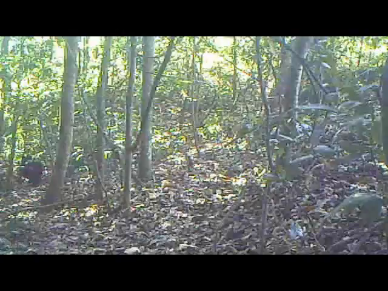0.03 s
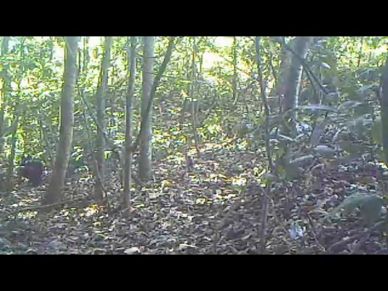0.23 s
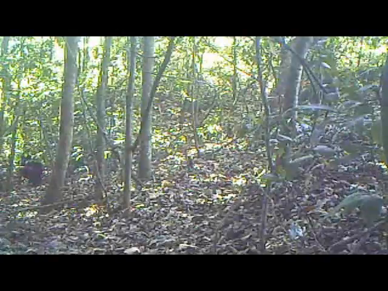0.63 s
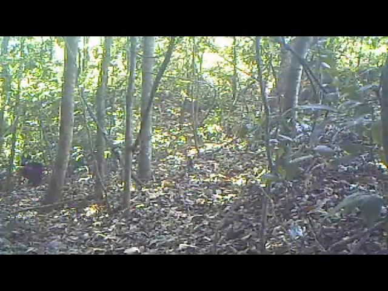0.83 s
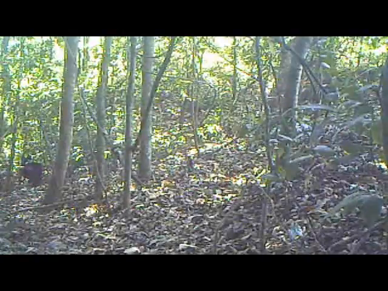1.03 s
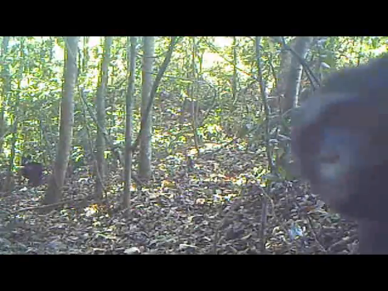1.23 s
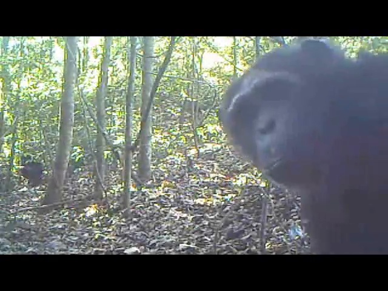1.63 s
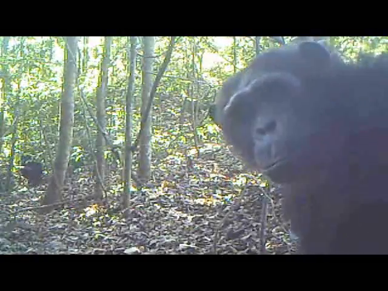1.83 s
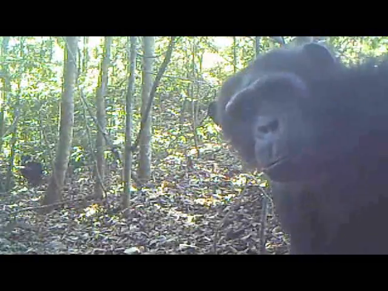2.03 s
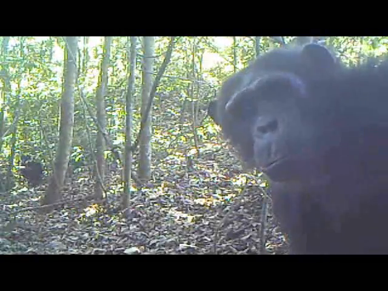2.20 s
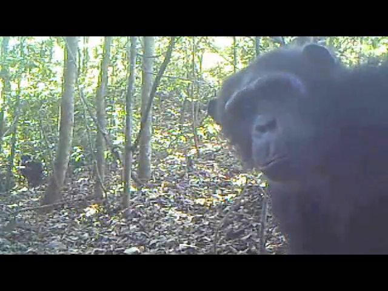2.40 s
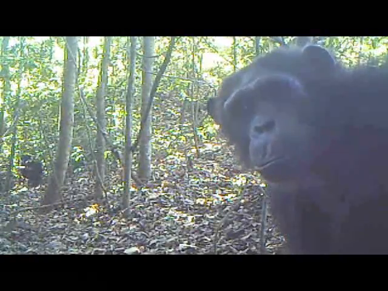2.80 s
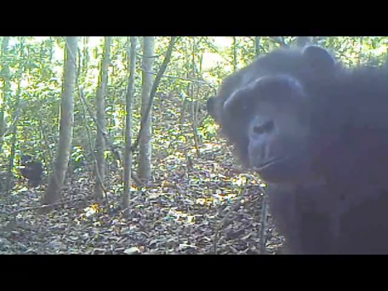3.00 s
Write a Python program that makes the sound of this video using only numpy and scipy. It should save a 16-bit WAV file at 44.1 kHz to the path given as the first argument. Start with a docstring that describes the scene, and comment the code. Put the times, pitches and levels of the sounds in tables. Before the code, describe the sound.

Dry leaves crunch and crackle under a chimpanzee's footsteps in a quiet forest.

```python
"""A chimpanzee walks through dry leaf litter past a small camera in a forest, then stops beside it.
Each footfall crushes a swarm of leaves into a crunch of tiny cracks; single leaves and twigs snap
on top, and the litter settles after it, all with a faint echo from the trees.
Behind sit a thin wavering insect tone, soft forest hiss, a low rumble at the microphone and a few
dull thumps. The camera housing adds a slight ring to the whole mix."""
import sys
import numpy as np
from scipy import signal
from scipy.fft import rfft, irfft, next_fast_len
from scipy.io import wavfile

SR = 44100
rng = np.random.default_rng(int(sys.argv[2]) if len(sys.argv) > 2 else 0)


def dump_mix(stems):
    """Bounce the given channels to the path in sys.argv[1] as a 16-bit WAV at rate SR."""
    frames = np.atleast_2d(stems).T  # one column per channel
    limited = np.clip(frames, -1, 1)  # hard clip at full scale
    pcm = np.round(limited * 32767).astype(np.int16)
    wavfile.write(sys.argv[1], SR, pcm)


N = 138915

# Footfalls: t/s of fullest weight, level/dB before STEP_DB, attack/s, release/s,
# leaf ring f/Hz, upper ring f/Hz, treble/dB, low crush/dB
FOOTFALLS = [(.214, -45.5, .026, 0.081, 2800, 8600, -1.5, 1.5),
             (.338, -52, 0.025, 0.17, 2730, 6750, 4, 3.5),
             (1.058, -41.5, 0.018, 0.011, 2740, 10300, 4.5, 6.5),
             (1.12, -53, 0.041, 0.037, 3330, 9700, -4, 1),
             (1.229, -44.5, 0.025, 0.05, 3570, 9150, -1, -1.5),
             (1.879, -43, 0.027, 0.016, 3480, 8600, 0, -0.5)]
# Light shuffles and settling leaves: t/s of the peak, level/dB before SHUFFLE_DB, the rest as above
LIGHT_SHUFFLES = [(.46, -56, 0.039, 0.051, 2960, 7620, -12.5, -10.5),
                  (.642, -54, 0.038, 0.013, 3140, 8750, -7, -3),
                  (.72, -67.5, 0.054, 0.17, 2900, 9600, -6, 1.5),
                  (.802, -59.5, 0.0073, 0.0095, 2800, 7400, -1, -1),
                  (1.305, -52.5, 0.015, 0.0086, 3200, 9500, -8, -2),
                  (1.378, -60.5, 0.0095, 0.03, 2900, 9300, -10, 7.5),
                  (1.51, -61, 0.24, 0.053, 3000, 9300, 0, 2.5),
                  (1.70, -65, 0.16, 0.16, 3230, 9200, 1.5, 1.5),
                  (1.828, -53, 0.025, 0.021, 3600, 9450, -3.5, -15),
                  (1.91, -54, 0.016, 0.0058, 2960, 8500, 3, 2),
                  (2.04, -62.5, 0.12, 0.097, 3300, 8700, -8.5, -13),
                  (2.345, -62.5, 0.013, .012, 2800, 8500, -5.5, -4),
                  (2.43, -76.5, 0.13, 0.19, 2997, 8650, -2, -7)]
# Single leaves that crack: t/s, level/dB, ring f/Hz, treble/dB
LEAF_SNAPS = [(0.2016, -25.5, 2910, -1.5), (0.2166, -49, 2200, -3), (0.231, -46, 2980, -14),
              (0.243, -33, 2950, -18), (.2762, -31.5, 2850, -1), (0.3172, -31, 1970, 8),
              (.3220, -29.5, 2680, 7), (0.326, -48, 3050, 7), (0.4108, -38, 2740, 0),
              (.4560, -43, 3000, -20), (0.529, -48, 2660, 7), (0.6451, -49, 3070, 4),
              (0.7007, -47.5, 2580, 5), (0.8, -46.5, 2930, 0), (0.9963, -49, 2500, -1),
              (1.0590, -29.5, 3020, 1), (1.0729, -34, 1840, -11), (1.1183, -36, 3300, 7),
              (1.1272, -38.5, 3490, 3), (1.2336, -28, 3770, 10), (1.3139, -35.5, 3260, 0),
              (1.3176, -36.5, 3030, 3), (1.3539, -45, 3200, -9), (1.3742, -40, 3800, 0),
              (1.3857, -38, 2350, -0.5), (1.5118, -56, 3000, 10), (1.5254, -59, 2930, -1),
              (1.6415, -45, 3400, -5), (1.8330, -35.5, 3200, -3), (1.8862, -39, 3380, 13),
              (1.9170, -37.5, 2700, -20), (1.9770, -43, 3300, 5), (2.0139, -45.5, 3500, -6),
              (2.018, -47, 3400, -2), (2.0358, -41, 3570, 1.5), (2.0392, -46, 3400, 6),
              (2.0549, -40.5, 3400, -1), (2.0712, -56, 3360, -6), (2.0801, -48.5, 2360, -18),
              (2.8306, -52, 3750, 2), (2.8347, -59.5, 3660, -6.5), (3.0755, -47.5, 3030, 7),
              (3.0901, -52.5, 1970, -6)]
# Twigs that break with a woody ring: t/s, level/dB, f/Hz, ring time/s
TWIG_BREAKS = [(.2050, -26, 3090, 0.0015), (0.7305, -43.5, 2810, 0.0019), (0.735, -48, 2640, 0.0017),
               (0.8495, -51.5, 2450, .0012), (1.1349, -32, 2470, 0.00079), (2.1359, -45, 4400, 0.0022),
               (2.8305, -55, 3880, .0012)]
# Base tone of every dry leaf, under its ring: f/Hz, relative level/dB
LEAF_EQ = [(100, -19), (250, -10.5), (450, -6), (700, -5.5), (1000, -2), (1900, 0), (3000, -1),
           (4400, -1.8), (5300, -1), (6200, -3.5), (8200, -3), (9200, -2), (10200, -2.5)]
# Path of the insect tone: t/s, f/Hz, level/dB
INSECT_PATH = [(.75, 2450, -84), (.93, 2470, -71.5), (1.502, 2544, -75.5), (1.8, 2545, -77),
               (1.955, 2556, -60), (2.0, 2556, -73), (2.10, 2553, -69), (2.18, 2545, -78),
               (2.35, 2518, -68), (2.46, 2502, -69), (2.75, 2493, -86.5)]
# Forest hiss: f/Hz, relative level/dB
HISS_EQ = [(100, -2.5), (200, 2), (400, -2), (800, -4.5), (1500, -9), (2100, -8), (2900, -1), (3600, -5),
           (4400, -13), (6300, -16), (10200, -18.5)]
# Rumble at the microphone: f/Hz, relative level/dB
RUMBLE_EQ = [(8, -3.5), (16, -0.5), (26, 1.5), (45, -11), (70, -15), (100, -20), (160, -26.5), (300, -39),
             (1000, -81.5)]
# Soft low thumps: t/s, level/dB, f/Hz
LOW_THUMPS = [(.645, -55, 62), (1.52, -57, 40), (1.92, -56, 40), (2.015, -54, 40), (2.34, -51, 24),
              (2.60, -55, 28), (2.735, -53, 50)]
# Narrow peaks and one dip of the camera housing: f/Hz, gain/dB
HOUSING_EQ = [(2045, 2.5), (2395, -1.5), (2719, 4), (3187, 3.5), (3509, 1.5), (4135, 3), (4544, 3)]
# Fade-in as the camera wakes: t/s, gain/dB
FADE_IN = [(.105, -54), (0.126, -11), (0.142, -5), (.18, -2.5)]

STEP_DB, STEP_CRACKS_PER_S, STEP_ROLL_S = 4.5, 3600, 0.017   # the roll rounds off each step's peak
SHUFFLE_DB, SHUFFLE_CRACKS_PER_S = 5.5, 900
TOUCH_ATTACKS = 3.7   # a foot touches down this many attack times before its fullest weight
CRACK_SPREAD_DB, CRACK_COLOUR_DB, RUB_DB = 4.5, 7.0, -3
RING_DB, RING_OCTAVES, UPPER_RING_DB, UPPER_RING_OCTAVES = 10, 0.34, 3.5, 0.12
TREBLE_HZ, CRUSH_HZ = 4630, 1620   # shelf corners
TEAR_S, TEAR_DB, SCATTER_S, SCATTER_DB = 0.00079, -10.5, 0.0046, -16
BRITTLENESS = 4.1   # dB less tearing per dB of treble
BODY_DB, BODY_DB_PER_OCTAVE, BODY_RING_HZ = -2.5, 17, 2600   # bigger, lower leaves have more body
TWIG_CRACK_DB, TWIG_SCATTER_DB = -6, -36
STRAY_PER_S, STRAY_DB, STRAY_SPREAD_DB = 60, -77, 3
FOREST_T60_S, FOREST_DB = 0.41, -18
INSECT_FLUTTER_DB, INSECT_WOBBLE_HZ = 3, 6
RUMBLE_RISE_S, THUMP_WIDTH_S = 0.085, 0.03
HOUSING_WIDTH_HZ, CUTOFF_HZ = 16, 10380


def treads(rows, cracks_per_s, roll_s):
    """From the first touch the crunch swells as weight comes onto the litter, then dies away."""
    t, out = np.arange(N) / SR, np.zeros(N)
    cracks = crackle(cracks_per_s)
    shifts = rng.integers(0, N, len(rows))   # each tread starts elsewhere in the crackle
    for (s, db, attack, release, ring_hz, upper_hz, treble_db, crush_db), shift in zip(rows, shifts):
        from_peak_s = np.hypot(t - s, roll_s) - roll_s
        weight = np.exp(-from_peak_s / np.where(t < s, attack, release))
        on = (weight > from_db(-60)) & (t > s - TOUCH_ATTACKS * attack)
        crunch = leaf(np.roll(cracks, shift)[on], ring_hz, treble_db, crush_db, upper_hz)
        out[on] += from_db(db) * weight[on] * rms_one(crunch)
    return out


def crackle(cracks_per_s):
    """Tiny cracks, each with its own size and colour, over the rub of leaf on leaf."""
    onsets = rng.random(N) < cracks_per_s / SR
    clicks = onsets * crack_sizes(CRACK_SPREAD_DB)
    edges_hz, cracks = np.linspace(100, 11500, 13), 0
    for band in zip(edges_hz, edges_hz[1:]):
        band_gains = from_db(CRACK_COLOUR_DB * rng.uniform(-1, 1, N)) * rng.choice([-1, 1], N)
        bandpass = signal.butter(2, band, "band", fs=SR, output="sos")
        cracks = cracks + signal.sosfilt(bandpass, clicks * band_gains + 1e-18)
    rub = from_db(RUB_DB) * rng.standard_normal(N)
    return rms_one(rms_one(cracks) + rub)


def leaf(x, ring_hz, treble_db, crush_db, upper_hz=None):
    """The voice of a dry leaf: a broad ring, perhaps an upper one, a crisp top and a low crush."""
    def db_at(f):
        def bell(hz, octaves):
            return np.exp(-.5 * (np.log2((f + 1) / hz) / octaves) ** 2)
        ring = RING_DB * bell(ring_hz, RING_OCTAVES)
        upper = UPPER_RING_DB * bell(upper_hz, UPPER_RING_OCTAVES) if upper_hz else 0
        high_shelf = treble_db * (1 - 1 / (1 + (f / TREBLE_HZ) ** 6))
        low_shelf = crush_db / (1 + (f / CRUSH_HZ) ** 4)
        return at_hz(LEAF_EQ, f) + ring + upper + high_shelf + low_shelf
    return equalise(x, db_at)


def leaf_snaps():
    """A leaf breaks with a click, tears on briefly and stirs its neighbours; all ring through it."""
    t, out = np.arange(2048) / SR, np.zeros(N)
    for s, db, ring_hz, treble_db in LEAF_SNAPS:
        tear = from_db(TEAR_DB - BRITTLENESS * treble_db) * np.exp(-t / TEAR_S)
        scatter = from_db(SCATTER_DB - max(treble_db, 0)) * np.exp(-t / SCATTER_S)
        burst = (t == 0) + rng.standard_normal(len(t)) * (tear + scatter)
        body_db = BODY_DB - BODY_DB_PER_OCTAVE * np.log2(ring_hz / BODY_RING_HZ)
        add(out, s, from_db(db) * tick_one(leaf(burst, ring_hz, treble_db, body_db)))
    return out


def twigs():
    """A bright crack sets one short woody mode ringing."""
    t, out = np.arange(2048) / SR, np.zeros(N)
    scatter = from_db(TWIG_SCATTER_DB) * np.exp(-t / SCATTER_S)
    for s, db, hz, ring_s in TWIG_BREAKS:
        burst = (t == 0) + rng.standard_normal(len(t)) * scatter
        mode = np.cos(2 * np.pi * hz * t) * np.exp(-t / ring_s)
        wood = tick_one(signal.fftconvolve(burst, mode)[:len(t)])
        crack = from_db(TWIG_CRACK_DB) * tick_one(leaf(burst, hz, treble_db=-2, crush_db=-8))
        add(out, s, from_db(db) * tick_one(wood + crack))
    return out


def stray_ticks():
    """Lone leaves tick here and there as the litter settles."""
    sizes = crack_sizes(STRAY_SPREAD_DB) * rng.choice([-1, 1], N)
    onsets = rng.random(N) < STRAY_PER_S / SR
    return from_db(STRAY_DB) * rms_one(leaf(sizes * onsets, ring_hz=3000, treble_db=0, crush_db=3.5))


def forest_echo(x):
    """Trunks and foliage scatter back a short, faint reverb tail."""
    t = np.arange(SR) / SR
    tail = rng.standard_normal(SR) * from_db(-60 * t / FOREST_T60_S)
    return from_db(FOREST_DB) * signal.fftconvolve(x, tail / np.linalg.norm(tail))[:N]


def insect():
    """One thin, far tone that flutters and slowly bends."""
    t = np.arange(N) / SR
    s, hz, db = np.transpose(INSECT_PATH)
    pitch_hz = np.interp(t, s, hz) + INSECT_WOBBLE_HZ * drift(30)
    level_db = np.interp(t, s, db) + INSECT_FLUTTER_DB * drift(32)
    return from_db(level_db) * np.sqrt(2) * np.sin(2 * np.pi * np.cumsum(pitch_hz) / SR)


def forest_hiss():
    """A soft bed of air with a slight flicker."""
    return noise_bed(HISS_EQ, level_db=-65.5, swell_db=0.96, rate_hz=20)


def rumble():
    """Low rumble at the microphone, taking a moment to come up as the camera wakes."""
    rise = np.tanh((np.arange(N) / SR / RUMBLE_RISE_S) ** 2 / 4)
    return rise * noise_bed(RUMBLE_EQ, level_db=-54.5, swell_db=2, rate_hz=10)


def thumps():
    """Dull swells a few cycles long, deep in the bass."""
    t, out = np.arange(N) / SR, np.zeros(N)
    for s, db, hz in LOW_THUMPS:
        swell = np.exp(-.5 * ((t - s) / THUMP_WIDTH_S) ** 2)
        out += from_db(db) * swell * np.sin(2 * np.pi * (hz * t + rng.random()))
    return out


def noise_bed(eq, level_db, swell_db, rate_hz):
    """Shaped noise whose level wanders a little."""
    gain = from_db(level_db + swell_db * drift(rate_hz))
    return gain * rms_one(equalise(rng.standard_normal(N), lambda f: at_hz(eq, f)))


def crack_sizes(spread_db):
    """A random gain for every sample: mostly small, now and then big."""
    return from_db(spread_db * np.minimum(rng.exponential(1, N), 3))


def drift(rate_hz):
    """Smooth random modulation at rms 1."""
    hop, run_in = 40, 2000   # samples per control point, control points to settle
    pole = np.exp(-2 * np.pi * rate_hz * hop / SR)
    noise = rng.standard_normal(N // hop + run_in + 2)
    slow = signal.lfilter([1], [1, -2 * pole, pole * pole], noise)[run_in:]
    return np.interp(np.arange(N) / hop, np.arange(len(slow)), rms_one(slow))


def equalise(x, db_at):
    """Minimum-phase EQ with the curve db_at(f): nothing rings ahead of a transient."""
    size = 2 * next_fast_len(len(x) // 2 + 512)
    hz = np.arange(size // 2 + 1) * SR / size
    cepstrum = irfft(np.log(from_db(db_at(hz))))
    cepstrum[1:size // 2] *= 2   # fold onto positive time
    cepstrum[size // 2 + 1:] = 0
    return irfft(rfft(x, size) * np.exp(rfft(cepstrum)))[:len(x)]


def at_hz(eq, hz):
    """Read an EQ curve in dB on a log-frequency axis."""
    f, db = np.transpose(eq)
    return np.interp(np.log(hz + 1), np.log(f), db)


def from_db(db):
    """Decibels to gain."""
    return 10 ** (np.asarray(db) / 20)


def rms_one(x):
    """Scale to rms 1."""
    return x / np.sqrt(np.mean(x ** 2) + 1e-20)


def tick_one(x):
    """Scale a tick to the energy of one millisecond at rms 1."""
    return x / np.sqrt(np.sum(x ** 2) / (SR / 1000))


def add(out, s, x):
    """Mix a sound in at s seconds."""
    part = out[int(s * SR):][:len(x)]
    part += x[:len(part)]


def scene():
    """Mono mix: feet in the litter up front, the forest around them."""
    steps = from_db(STEP_DB) * treads(FOOTFALLS, STEP_CRACKS_PER_S, STEP_ROLL_S)
    shuffles = from_db(SHUFFLE_DB) * treads(LIGHT_SHUFFLES, SHUFFLE_CRACKS_PER_S, roll_s=0)
    litter = steps + shuffles + leaf_snaps() + twigs() + stray_ticks()
    return (litter + rumble() + forest_echo(litter) + insect() + forest_hiss() + thumps())[None]


def record(dry):
    """The housing rings faintly; the camera fades the sound in and cuts the top."""
    def housing_db(f):
        return sum(db / (1 + ((f - hz) / HOUSING_WIDTH_HZ) ** 2) for hz, db in HOUSING_EQ)
    housed = equalise(dry[0], housing_db)
    fade = from_db(np.interp(np.arange(N) / SR, *np.transpose(FADE_IN)))
    lowpass = signal.ellip(8, .3, 60, CUTOFF_HZ, fs=SR, output="sos")
    return signal.sosfilt(lowpass, housed * fade)[None]


dry = scene()
out = record(dry)
dump_mix(out)
```